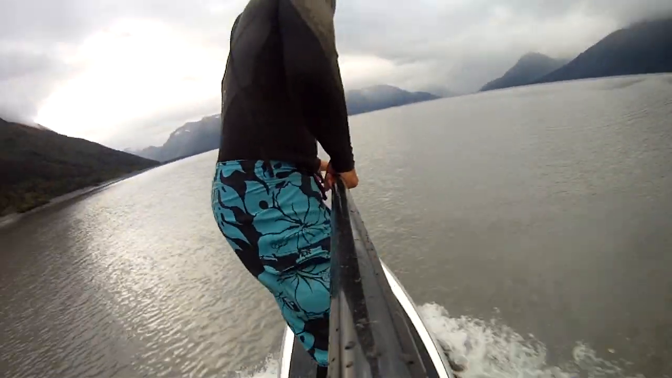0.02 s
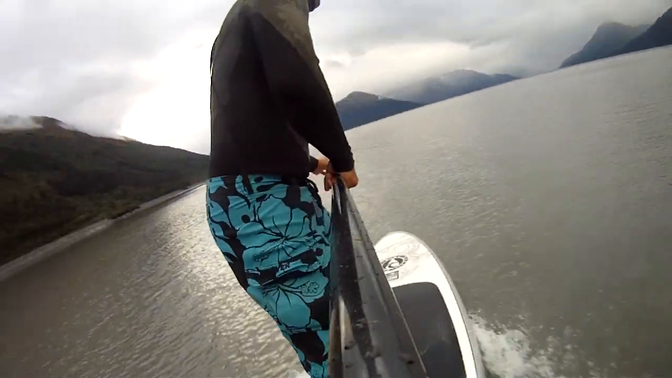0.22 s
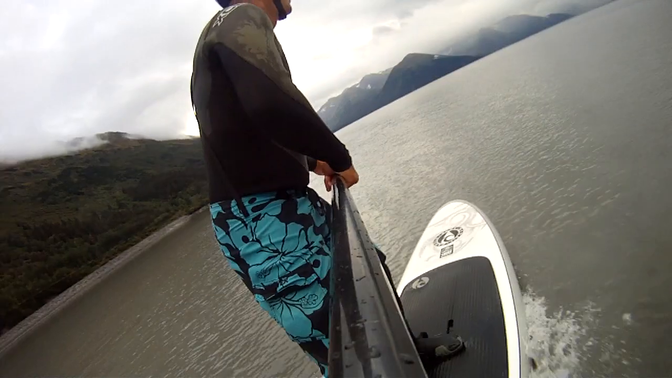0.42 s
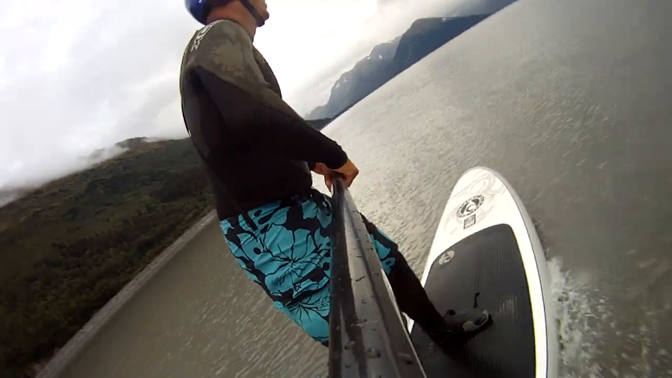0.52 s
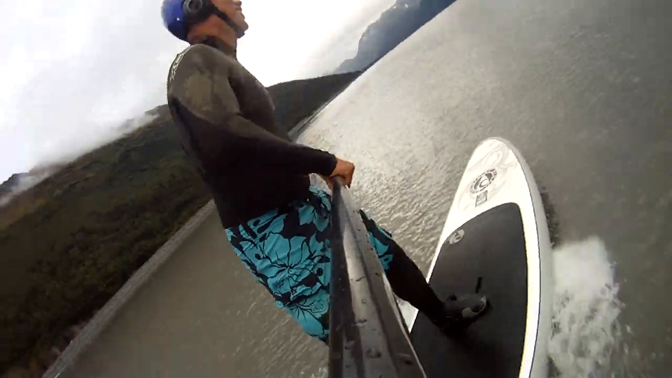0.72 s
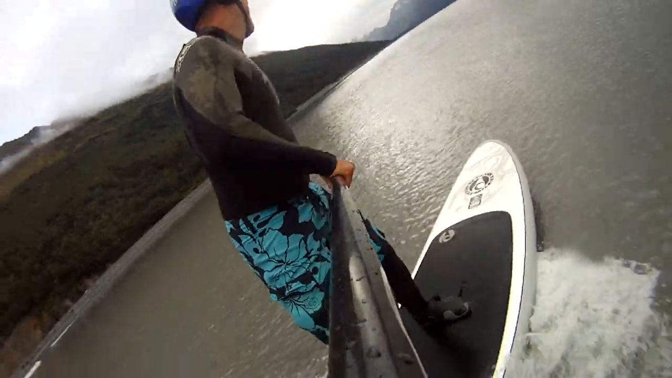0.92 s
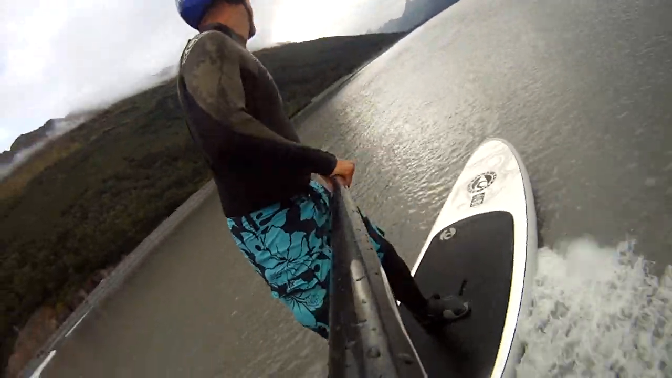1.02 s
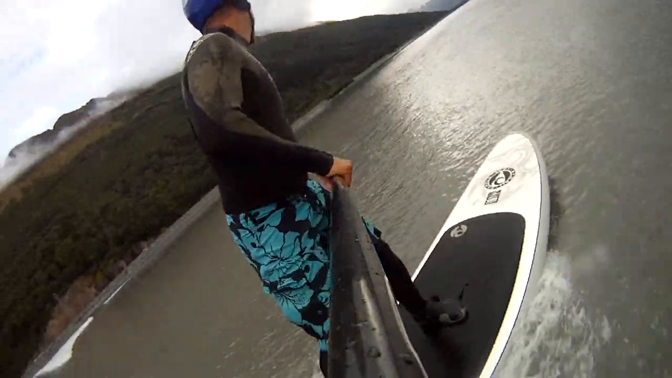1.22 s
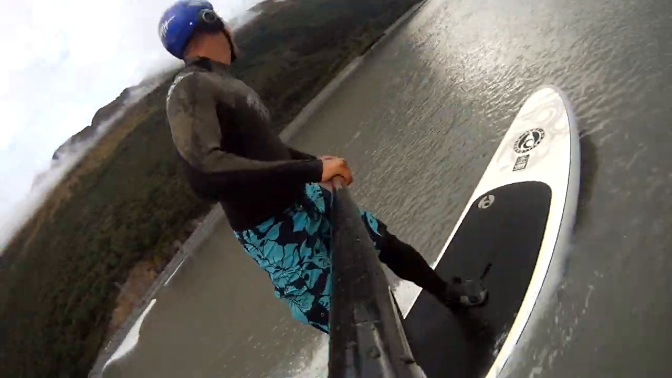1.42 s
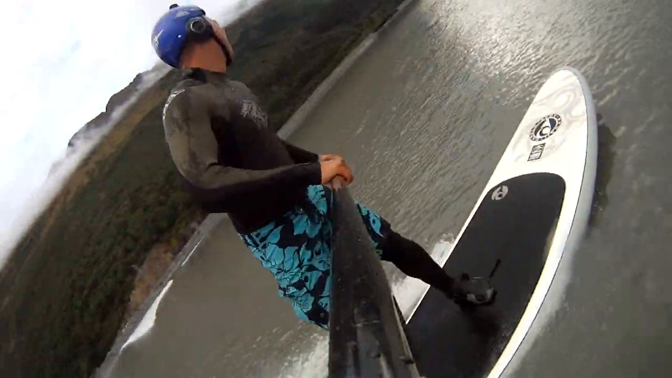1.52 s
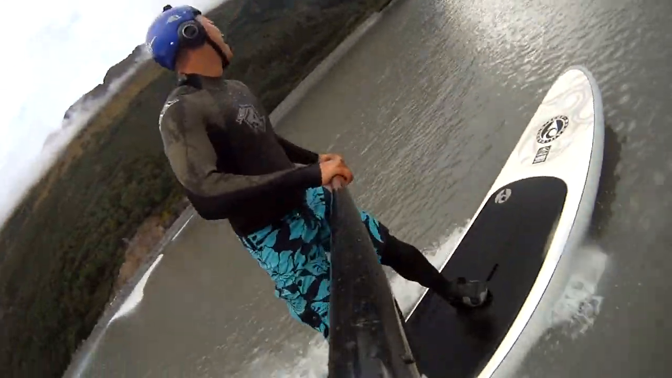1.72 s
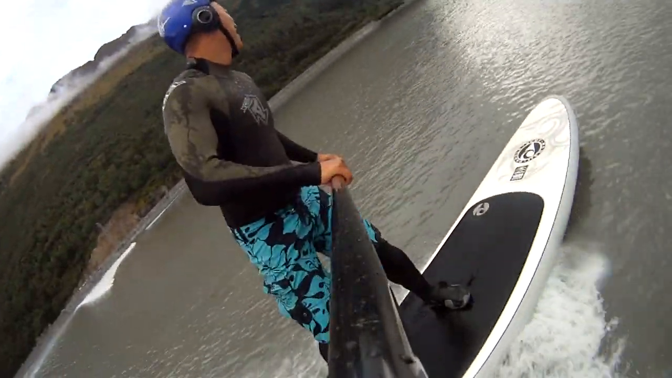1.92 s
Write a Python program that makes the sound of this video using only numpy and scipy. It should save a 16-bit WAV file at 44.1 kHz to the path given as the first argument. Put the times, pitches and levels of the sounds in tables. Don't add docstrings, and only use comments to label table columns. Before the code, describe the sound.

Foamy water rushes by on open water, muffled and gritty through a cased microphone on a pole; early deep thuds and a hard clack, a tiny groan and creaks, then smaller bumps under gusting wind.

```python
import sys
import numpy as np
from scipy import signal
from scipy.fft import rfft, irfft, next_fast_len
from scipy.io import wavfile
from scipy.ndimage import uniform_filter1d, map_coordinates

SR = 44100
rng = np.random.default_rng(int(sys.argv[2]) if len(sys.argv) > 2 else 0)


def voltage_ratio(level):
    return 10 ** (np.asarray(level, float) / 20)


def generate_wav(sig):
    pcm = np.round(np.clip(np.atleast_2d(sig).T, -1, 1) * 32767).astype(np.int16)
    wavfile.write(sys.argv[1], SR, pcm)


N = 88200

# t/s, level/dB, f/Hz, rise/s, t60/s
SHAFT_JOLTS = [(.001, -22.5, 42, 0.0025, 0.071), (.08, -31, 40.7, .01, 0.14),
               (.158, -29.5, 52, 0.012, 0.13), (.219, -19, 50.4, 0.017, 0.11),
               (0.2631, -7, 49.8, .005, 0.11), (0.339, -11.5, 72.6, 0.017, 0.16),
               (0.433, -17, 59.6, 0.0089, 0.087), (0.476, -15.5, 53.5, 0.0038, 0.083),
               (.543, -28, 54.7, .005, 0.081), (0.633, -35, 56.6, .015, .2),
               (0.847, -30, 63.6, 0.022, 0.24), (1.183, -27.5, 63, 0.0079, 0.071),
               (1.294, -21, 76, 0.0024, 0.042), (1.319, -28, 70, 0.0044, 0.11),
               (1.343, -28.5, 72, 0.0045, 0.19), (1.38, -22, 57.1, 0.016, 0.3),
               (1.551, -24.5, 52.4, 0.02, 0.46), (1.701, -26.5, 48, .02, 0.18),
               (1.819, -34.5, 51.3, 0.0084, 0.16), (1.946, -32.5, 56, 0.0072, .25)]
# f/Hz, density/dB per Hz
SHUDDER_SPECTRUM = [(90, -4), (130, -2), (190, -8.5), (330, -24), (900, -45)]
# t/s, level/dB, contact/s, upper-mode level/dB
MOUNT_KNOCKS = [
    (0.2643, -14.5, 0.0014, 4.5),
    (0.4721, -16.5, 0.0034, -30),
]
# f/Hz, level/dB, t60/s
MOUNT_MODES = [(140, 3, 0.062), (348, -3.5, 0.065), (736, 1, 0.031), (1115, 4.5, 0.025),
               (1247, -1.5, 0.064), (1685, -0.5, 0.027), (2050, -2, 0.02), (2710, 4.5, 0.012),
               (3500, 0.5, .014)]
# t/s, f/Hz, level/dB
GROAN_PITCH = [
    (0.493, 115, -35),
    (.503, 140, -30),
    (0.514, 184, -31),
    (.533, 201.5, -31),
    (.548, 234, -47.5),
    (.57, 245, -58),
]
# multiple of the slip rate, level/dB
GROAN_PARTIALS = [(1, 0), (2, -9.5), (3, -12), (4, -15)]
# t/s, length/s, level/dB, slip rate/Hz, low-pass f/Hz
GRIP_CREAKS = [
    (.001, 0.014, -43.5, 200, 600),
    (.332, .05, -37, 140, 1420),
    (0.479, .028, -39, 123, 1300),
    (0.496, 0.046, -43, 300, 1300),
    (0.52, 0.02, -38.5, 250, 2010),
    (.545, 0.016, -42, 200, 500),
    (1.29, 0.073, -49, 97, 99),
]
# f/Hz, width/Hz, level/dB
GRIP_RESONANCES = [(162, 137, 2), (275, 115, 2.5), (500, 430, -3.5), (703, 140, 1.5), (1220, 144, 5),
                   (1840, 120, 5.5), (2300, 360, -2.5)]
# t/s, level/dB
WIND_LEVEL = [(0, -1.5), (.25, -0.5), (.6, 0), (0.751, -1), (.9, 1), (1.1, -1), (1.3, 3.5), (1.75, 1.5),
              (1.85, 0), (2, -3)]
# f/Hz, density/dB per Hz
RUMBLE_SPECTRUM = [(20, -6.5), (35, 0.5), (55, -1.5), (80, -7.5), (120, -19.5), (200, -36.5)]
# f/Hz, density/dB per Hz
WHOOSH_SPECTRUM = [(110, -8), (200, 2.5), (350, -0.5), (600, -4.5), (850, -5.5), (1100, -12)]
# t/s, flow level/dB, splash level/dB
WASH_LEVEL = [(0, -39.5, -27), (.31, -41, -5), (.48, -40.5, 9.5), (.78, -41.5, 3), (1.05, -40.5, -12.5),
              (1.25, -42, 5), (1.3, -41, 7.5), (1.46, -44, 8.5), (1.55, -45, 4), (1.76, -43.5, -10.5),
              (2, -42, -12)]
# f/Hz, density/dB per Hz
HISS_SPECTRUM = [(150, -13.5), (300, -15), (850, -13), (1100, -8.5), (2800, -6), (3100, -11.5), (4100, -16),
                 (5300, -9.5)]
# f/Hz, width/Hz, lift/dB
CASE_RESONANCES = [(506, 20, 5), (1259, 225, 8.5), (1730, 120, 0.5), (2480, 820, 3), (3657, 670, 9.5),
                   (4990, 300, 1.5)]


def unit(x):
    return x / np.sqrt(np.mean(x ** 2) + 1e-20)


def along(points, hz):
    f, value = np.transpose(points)
    return np.interp(np.log(hz + 1), np.log(f + 1), value)


def wobble(rate):
    return map_coordinates(rng.standard_normal(int(N * rate / SR) + 4), [np.arange(N) * rate / SR])


def filtered(x, response):
    m = next_fast_len(N + SR // 2)
    return irfft(rfft(x, m) * response(np.fft.rfftfreq(m, 1 / SR)), m)[:N]


def peak(f, hz, width):
    return 1j * f * width / (hz * hz - f * f + 1j * f * width)


def add(track, s, x):
    track[max(round(s * SR), 0):][:len(x)] += x


def low_noise(points):
    skirted = [(5.1, -60), *points, (1500, -90)]
    return unit(filtered(rng.standard_normal(N), lambda f: voltage_ratio(along(skirted, f))))


def shaft_swings():
    stiffening = 4
    damping_power = 1.364
    bending, size, t = np.zeros(N + SR), np.zeros(N + SR), np.arange(SR) / SR
    for s, db, hz, rise, t60 in SHAFT_JOLTS:
        free = voltage_ratio(db - 60 * np.abs(t / t60) ** damping_power)
        swing = free * (1 - np.exp(-t / abs(rise)))
        turns = np.cumsum(hz * (1 + stiffening * free ** 2)) / SR
        add(bending, s, -swing * np.sin(2 * np.pi * turns))
        add(size, s, swing)
    shudder_gain = voltage_ratio(-24 + 2.64 * wobble(40.09))
    return bending[:N] + shudder_gain * size[:N] * low_noise(SHUDDER_SPECTRUM)


def knocks():
    upper_hz, soft_s = 1900, 0.00053
    out, t = np.zeros(N + SR), np.arange(SR // 5) / SR
    for s, db, contact, upper_db in MOUNT_KNOCKS:
        ring = np.zeros(len(t))
        for hz, mode_db, t60 in MOUNT_MODES:
            decay = voltage_ratio(mode_db + upper_db * (hz > upper_hz) - 60 * t / t60)
            ring += decay * np.sin(2 * np.pi * hz * t)
        ring *= 1 - np.exp(-(t / soft_s) ** 2)
        touches = (rng.random(len(t)) < .03) * rng.standard_normal(len(t))
        rattle = .3 * np.exp(-t / contact) * touches
        add(out, s, voltage_ratio(db - 9.5) * (ring + signal.fftconvolve(ring, rattle)[:len(t)]))
    return out[:N]


def groan():
    s, hz, db = np.transpose(GROAN_PITCH)
    t = np.arange(N) / SR
    turns = np.cumsum(np.interp(t, s, hz) * (1 + 0.038 * wobble(150))) / SR
    stack = np.zeros(N)
    for k, partial_db in GROAN_PARTIALS:
        stack += voltage_ratio(partial_db + 1.5 * k * wobble(90)) * np.sin(2 * np.pi * k * turns)
    scratch = rng.standard_normal(N) * np.abs(np.sin(np.pi * turns)) ** 3
    scratch = unit(filtered(scratch, lambda f: peak(f, 1100, 1460) ** 2))
    level = voltage_ratio(np.interp(t, [s[0] - .006, *s, s[-1] + 0.011], [-90, *db, -90]))
    return level * (stack + voltage_ratio(-10.5) * scratch)


def grip_response(f, dull_hz):
    modes = sum((-1) ** k * voltage_ratio(db) * peak(f, hz, width) for k, (hz, width, db) in enumerate(GRIP_RESONANCES))
    return modes / (1 + 1j * f / dull_hz) ** 2


def creaks():
    speed_up, jitter, slip_size_db, rub_level = 0.43, 0.056, 4.5, 0.067
    grip_on_s, grip_off_s = 0.0046, 0.023
    out, t = np.zeros(N), np.arange(SR // 5) / SR
    for s, length, db, rate, dull_hz in GRIP_CREAKS:
        slip_rate = rate * (1 + speed_up * (t / length - .5) + jitter * wobble(300)[:len(t)])
        turns = np.cumsum(slip_rate) / SR
        slips = np.diff(np.floor(turns + .7), prepend=0) * voltage_ratio(slip_size_db * rng.standard_normal(len(t)))
        rub = rub_level * rng.standard_normal(len(t)) - slips
        hand = np.clip(np.minimum(t / grip_on_s, (length - t) / grip_off_s), 0, 1)
        force = np.zeros(N + SR)
        add(force, s, rub * hand)
        creak = unit(filtered(force[:N], lambda f: grip_response(f, dull_hz)))
        out += voltage_ratio(db) * creak * np.sqrt(length * SR / N)
    return out


def wind():
    rumble = voltage_ratio(-44.5 + 2 * wobble(11.83)) * low_noise(RUMBLE_SPECTRUM)
    whoosh = voltage_ratio(-58 + 2.0 * wobble(16)) * low_noise(WHOOSH_SPECTRUM)
    gusts = voltage_ratio(np.interp(np.arange(N) / SR, *np.transpose(WIND_LEVEL)))
    return gusts * (rumble + whoosh)


def patchy(patchy_db):
    z = signal.stft(rng.standard_normal(N + 512), nperseg=512)[2]
    field = uniform_filter1d(rng.standard_normal(z.shape), size=6, axis=0)
    field = uniform_filter1d(field, size=8, axis=1)
    return unit(signal.istft(z * voltage_ratio(patchy_db * unit(field)), nperseg=512)[1][:N])


def bubbles(count=5000):
    median_hz, spread, cycles, size_db = 1881, .6, 2.78, 2
    u, g, t = rng.random((count, 2)), rng.standard_normal((count, 1)), np.arange(500) / SR
    hz = median_hz * np.exp(spread * g)
    life = t * hz / cycles
    ring = np.sin(2 * np.pi * hz * t * (1 + 0.088 * life)) * life * np.exp(-2 * life)
    ring *= voltage_ratio(-size_db * np.log(u[:, :1] + 0.035))
    at = (u[:, 1:] * N).astype(int) + np.arange(500)
    return unit(np.bincount(at.ravel(), ring.ravel())[:N])


def case_colour(f):
    lift = sum(db * abs(peak(f, hz, width)) ** 2 for hz, width, db in CASE_RESONANCES)
    return voltage_ratio(along(HISS_SPECTRUM, f) + lift) * abs(peak(f, 1700, 90000))


def wash():
    s, db, splash_db = np.transpose(WASH_LEVEL)
    t = np.arange(N) / SR
    flow_db = np.interp(t, s, db) + .5 * wobble(7.7) + 0.49 * wobble(70)
    splash = bubbles() + patchy(patchy_db=-2.5)
    splash = unit(filtered(splash, lambda f: abs(peak(f, 1760, 1300)) ** 2))
    foam = patchy(patchy_db=1.7) + voltage_ratio(-8) * bubbles()
    foam += voltage_ratio(-15.5 + np.interp(t, s, splash_db)) * splash
    return voltage_ratio(flow_db + 1.5) * unit(filtered(foam, case_colour))


def scene():
    mono = shaft_swings() + knocks() + groan() + creaks() + wind() + wash()
    return np.array([mono, mono])


def roll_off(x):
    return signal.sosfilt(signal.butter(12, 15850, fs=SR, output="sos"), x)


def record(dry):
    edge_hz, edge_order, floor_db = 5524, 47, -14.5
    band = filtered(dry[0], lambda f: voltage_ratio(floor_db) + 1 / np.sqrt(1 + (f / edge_hz) ** (2 * edge_order)))
    slow = signal.resample_poly(band, 40, 147, window=("kaiser", 3))
    held = signal.resample_poly(np.repeat(slow, 4), 147, 160)[:N]
    held = filtered(held, lambda f: f < 15300)
    return roll_off(np.array([held, held]))


dry = scene()
out = record(dry)
generate_wav(out)
```